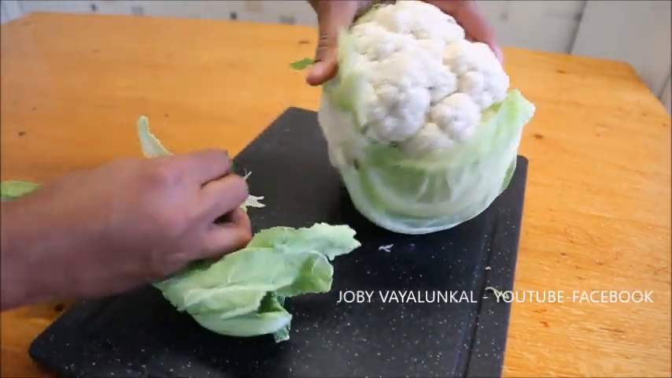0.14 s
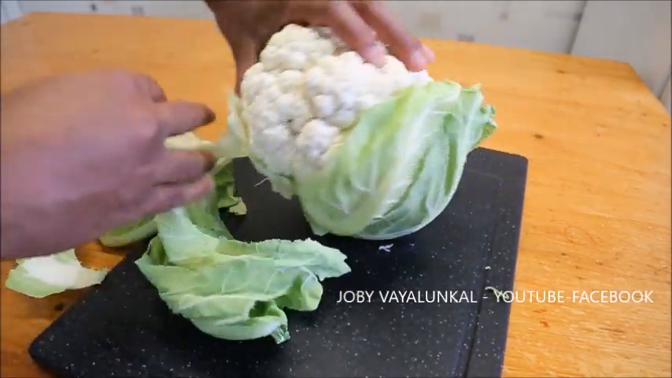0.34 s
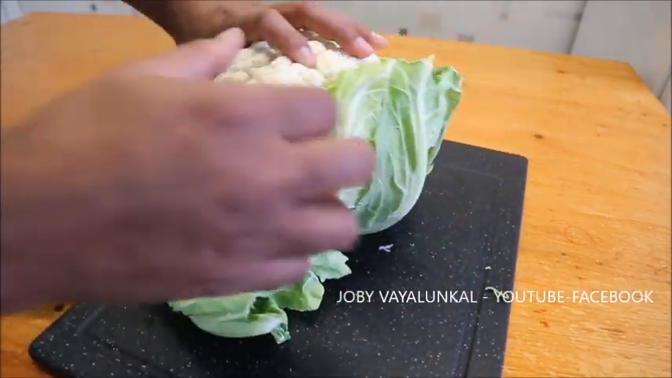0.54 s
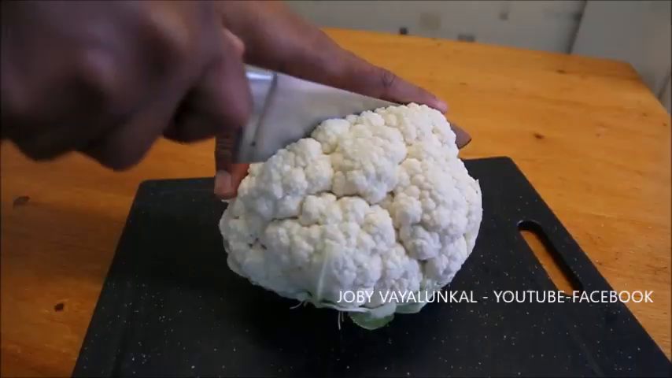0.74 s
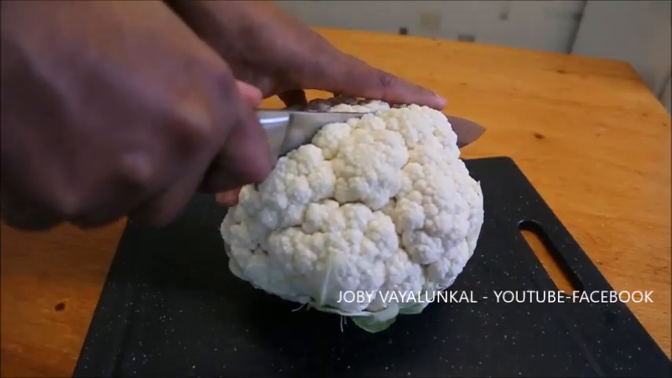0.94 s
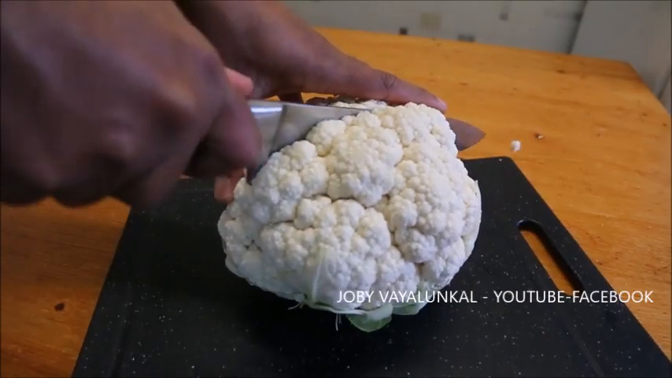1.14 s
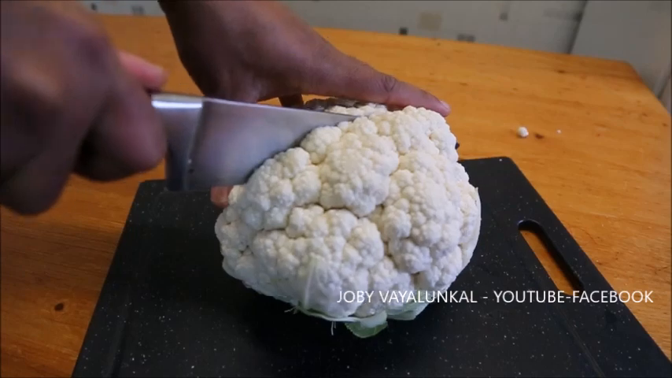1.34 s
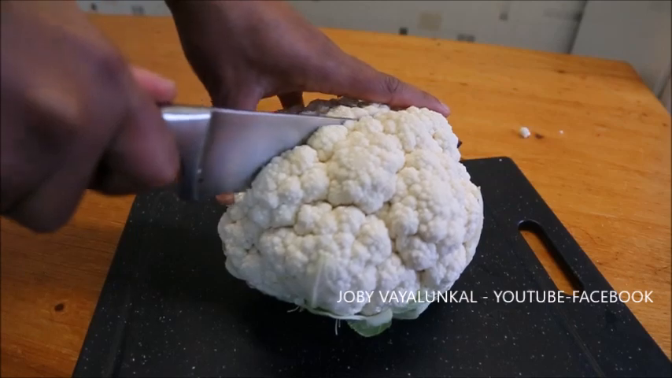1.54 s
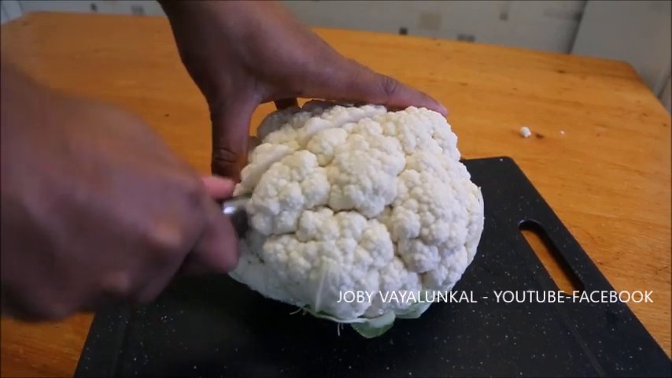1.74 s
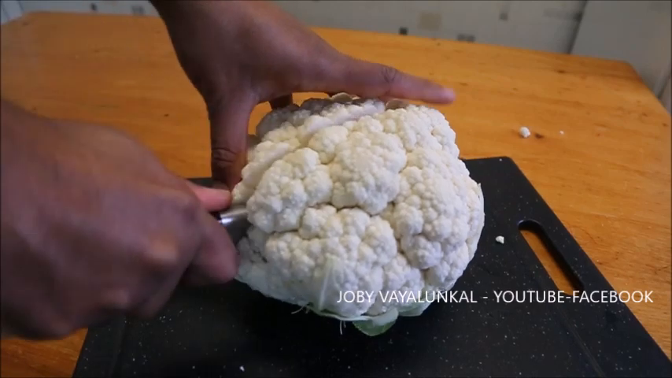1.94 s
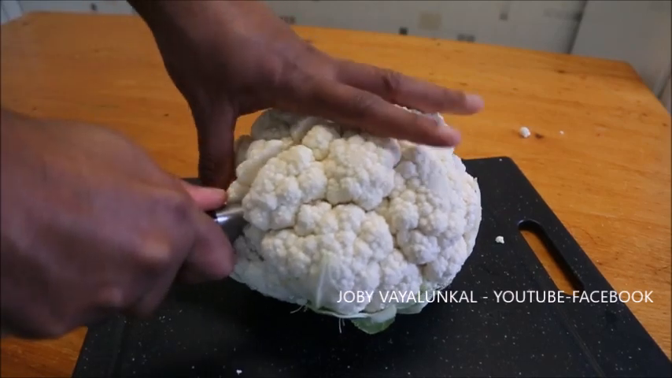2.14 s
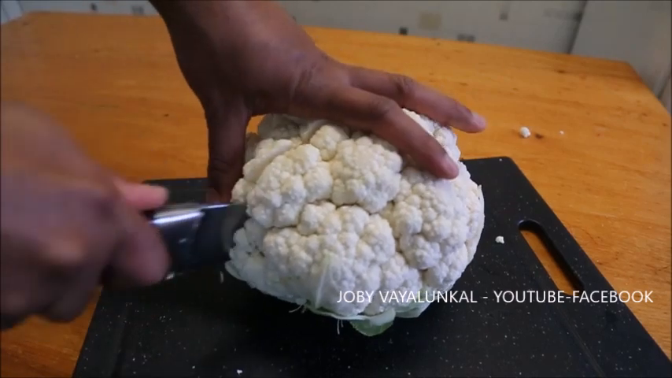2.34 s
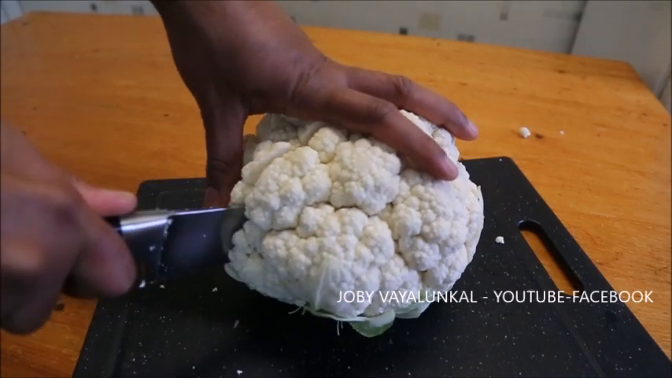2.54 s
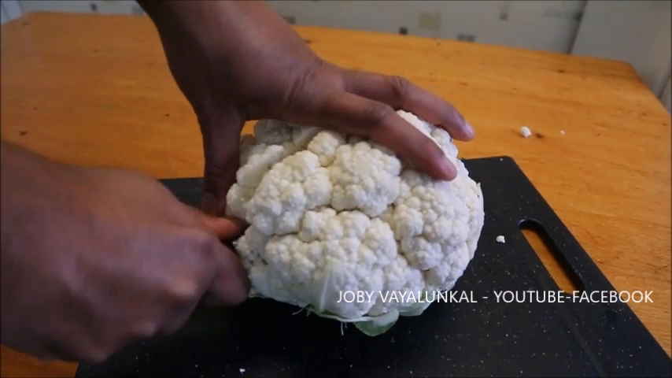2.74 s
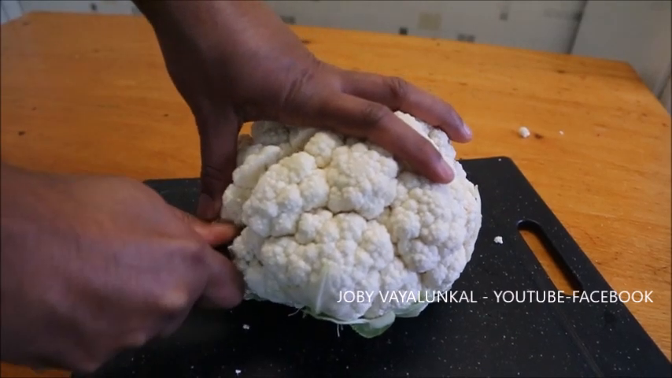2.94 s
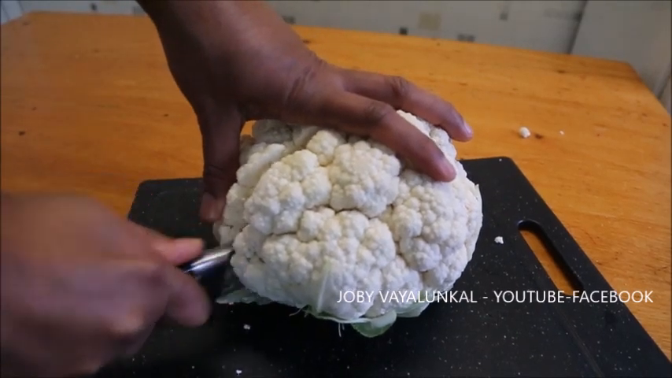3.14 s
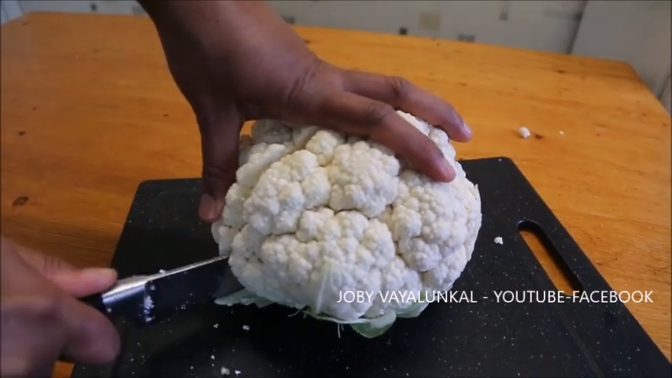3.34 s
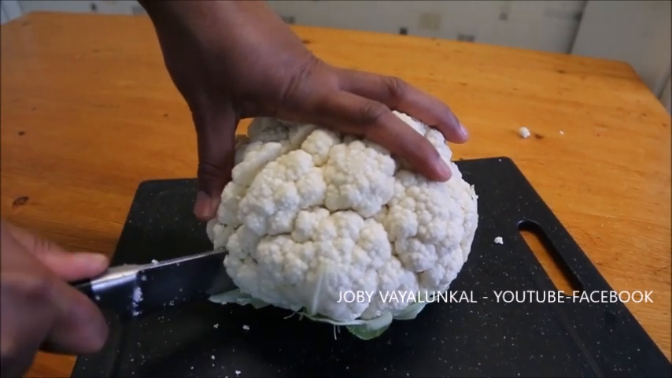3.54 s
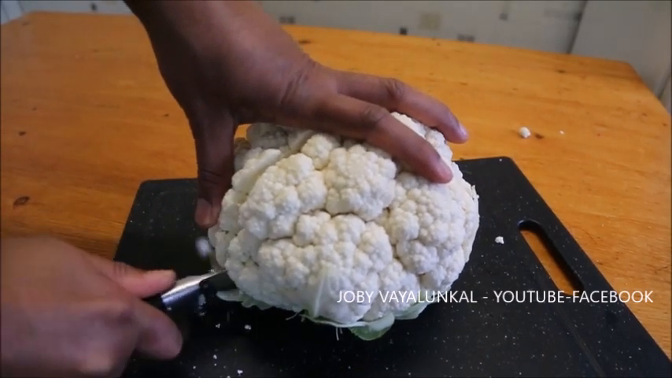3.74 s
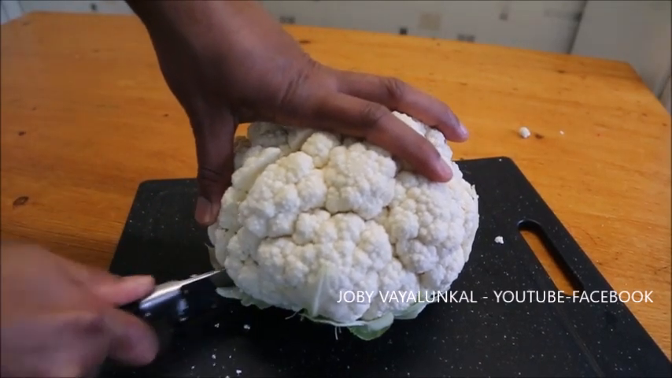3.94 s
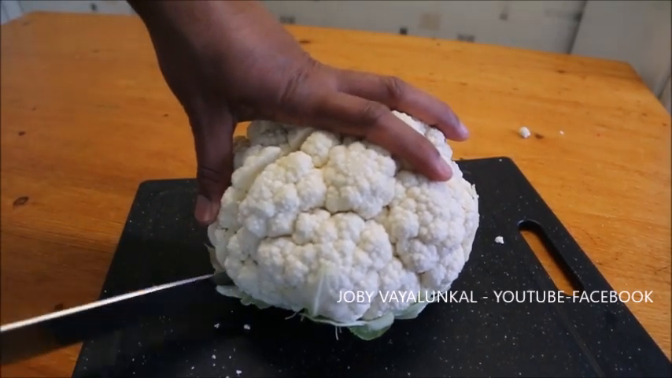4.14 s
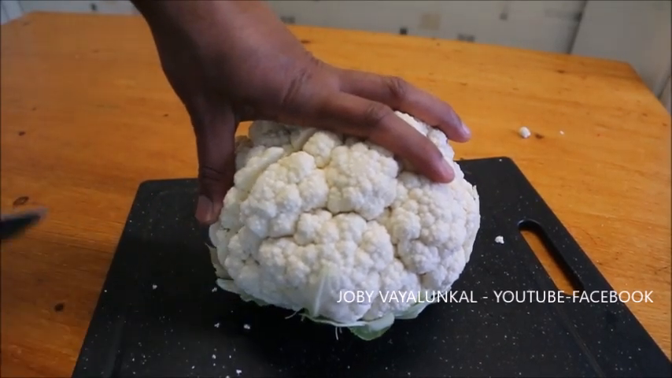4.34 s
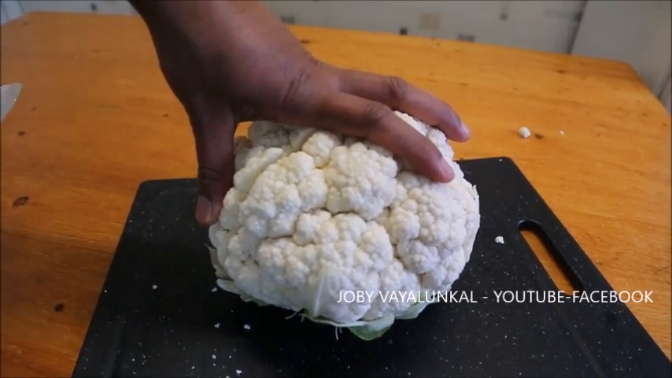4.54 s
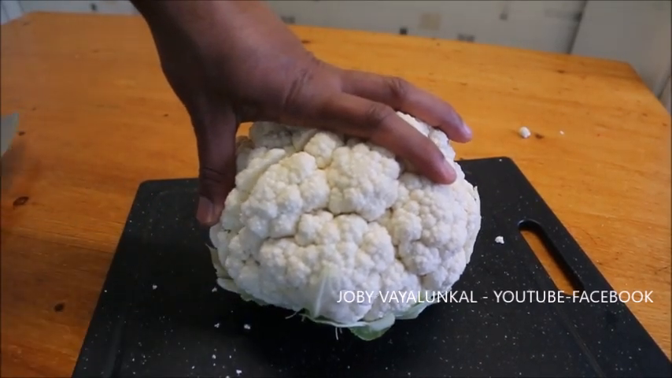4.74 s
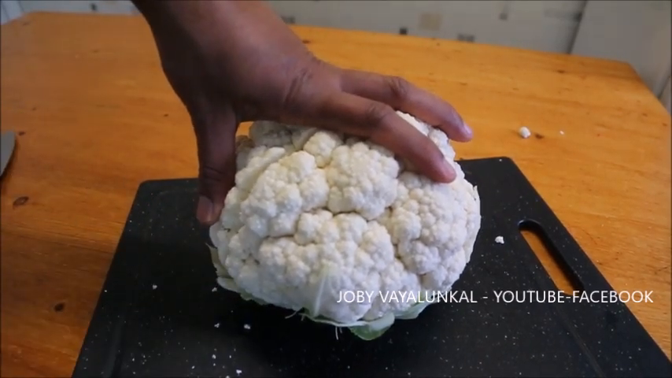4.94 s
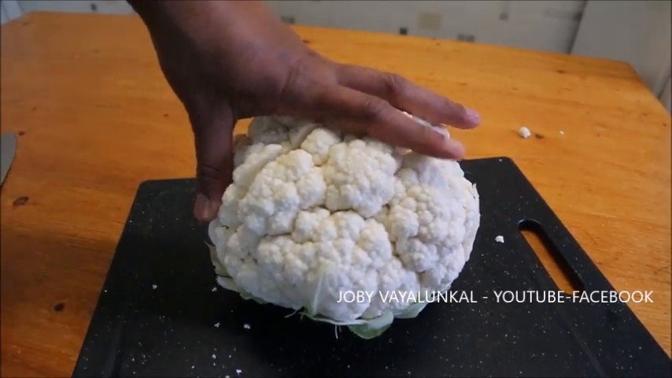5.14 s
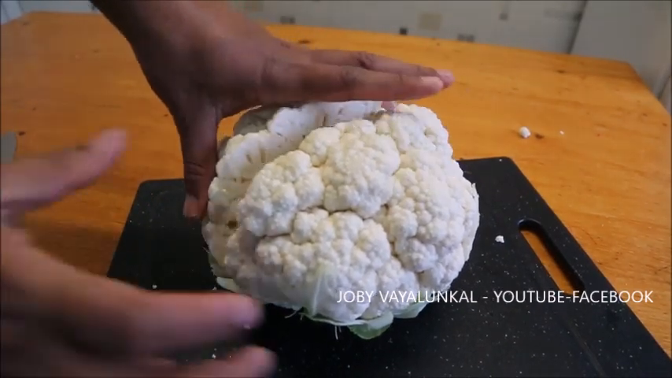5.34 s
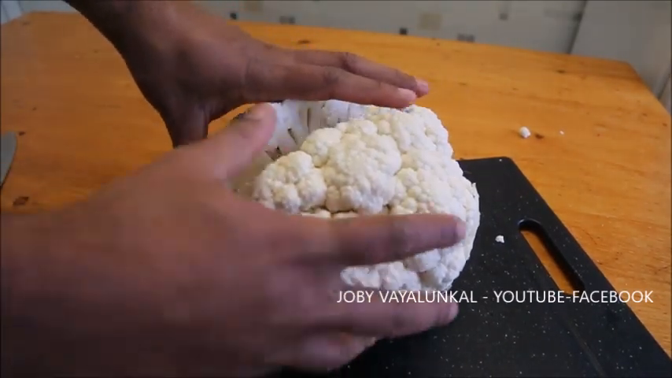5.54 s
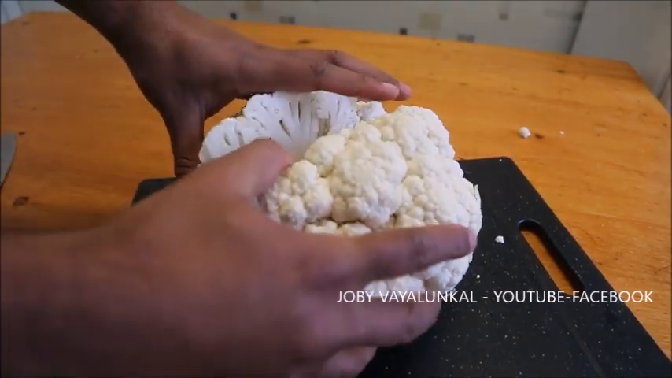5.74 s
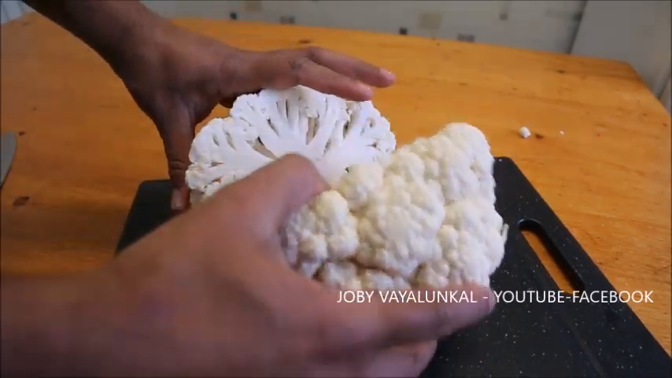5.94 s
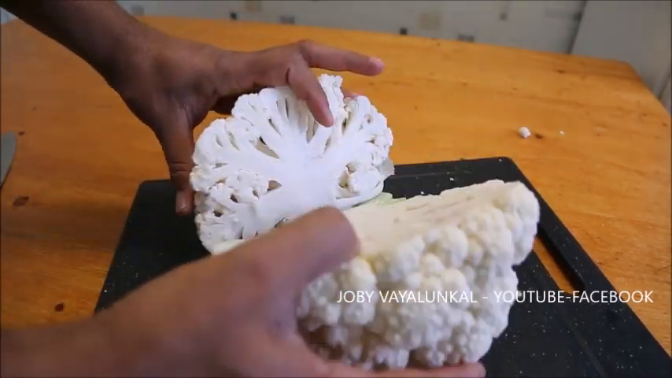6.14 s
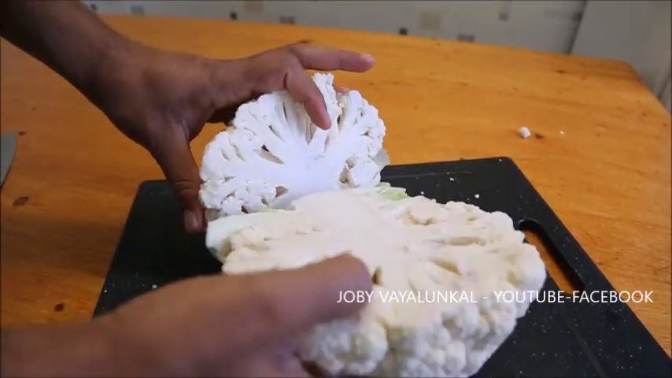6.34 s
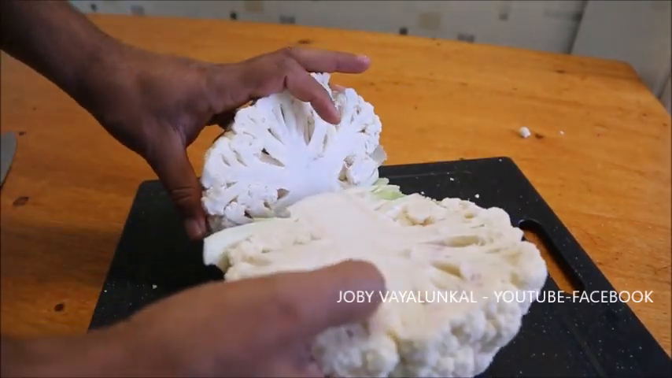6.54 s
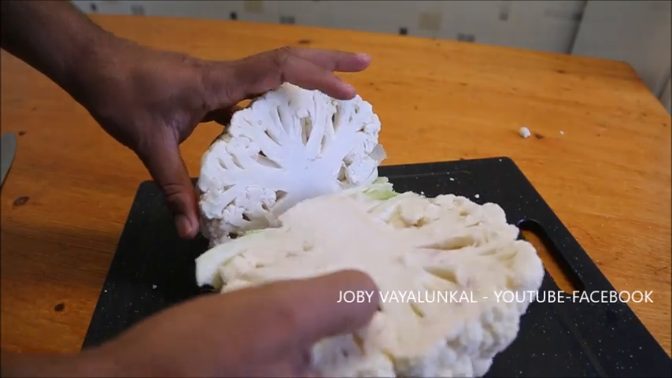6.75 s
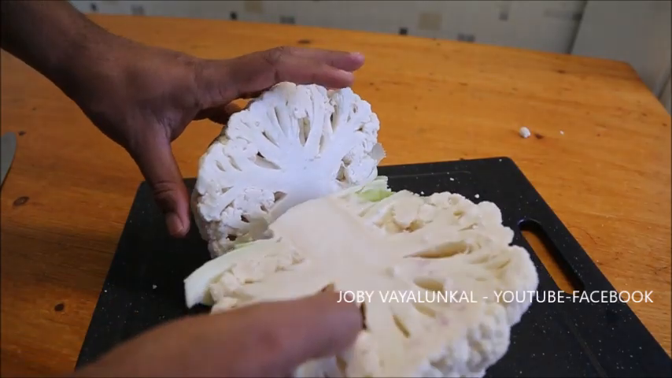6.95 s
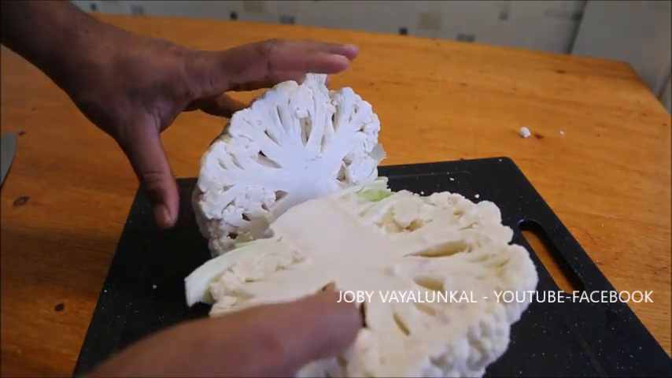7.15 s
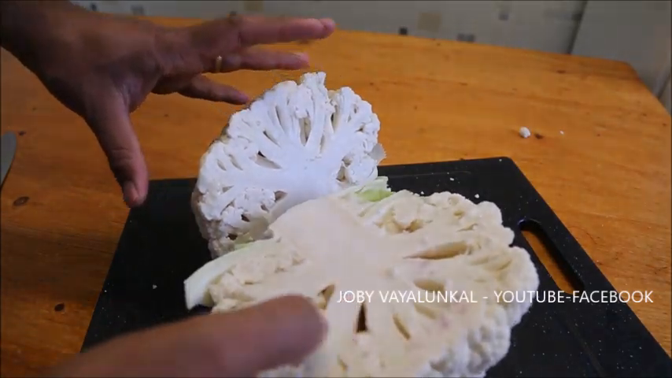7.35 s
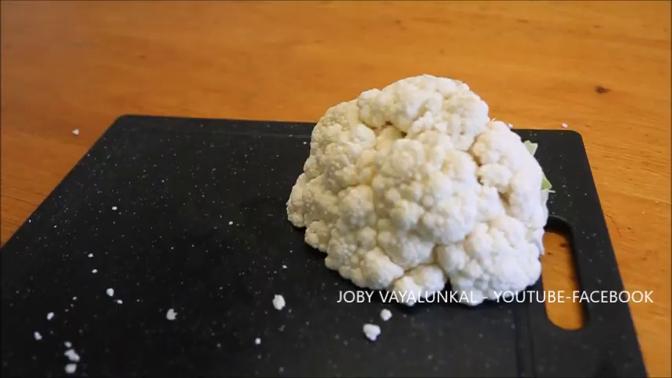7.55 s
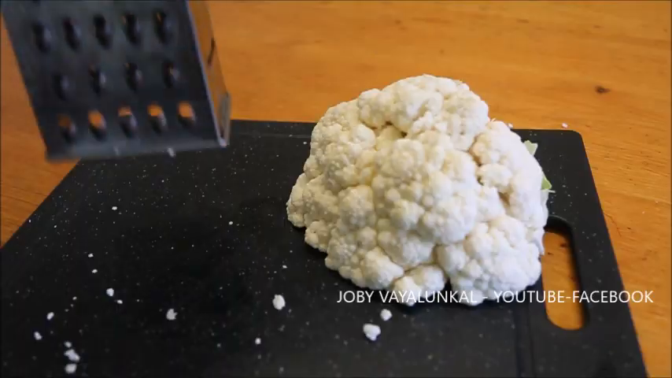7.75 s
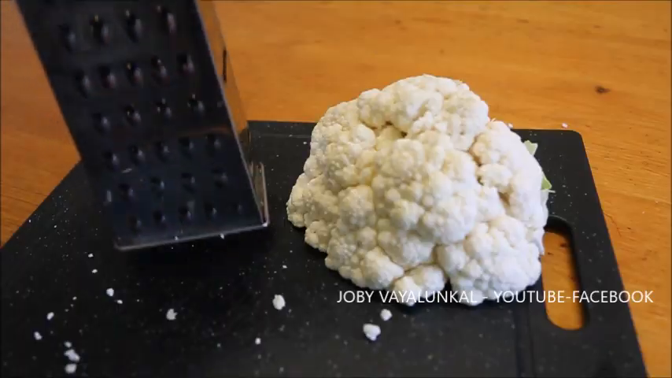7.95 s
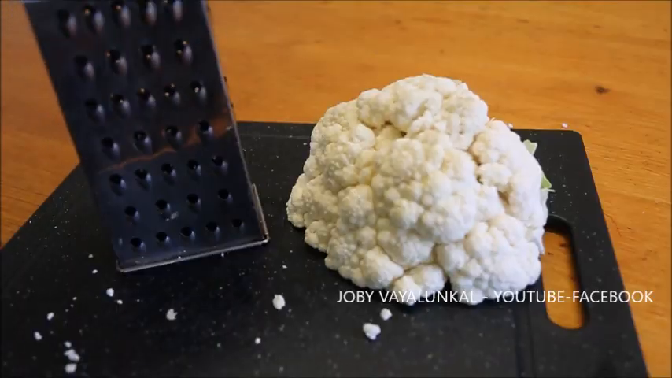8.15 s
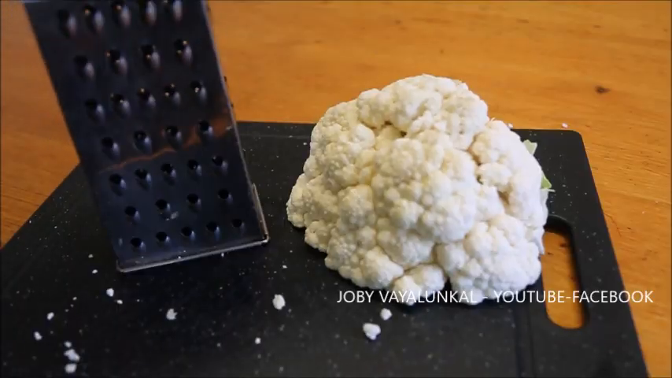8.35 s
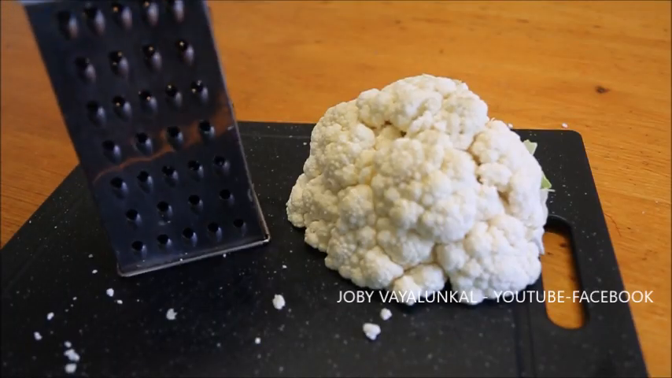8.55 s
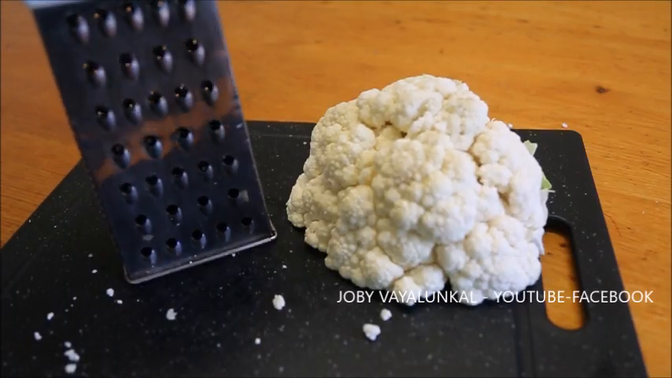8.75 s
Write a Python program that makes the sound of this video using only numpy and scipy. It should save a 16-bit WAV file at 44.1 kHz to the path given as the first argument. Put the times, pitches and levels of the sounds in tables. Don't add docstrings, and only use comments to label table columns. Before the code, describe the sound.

In a hard-walled, echoing kitchen with a steady fridge hum, leaves snap and rustle, then a knife squeaks and crunches into a cauliflower. Two hard chops crack onto a plastic board, overloading the small close microphone. The blade pulls free with a faint ring, clatters on the table, the halves thud apart, and a metal grater lands.

```python
import sys
import numpy as np
from scipy import signal
from scipy.fft import rfft, irfft, next_fast_len
from scipy.io import wavfile
from scipy.ndimage import uniform_filter1d

SR = 44100
rng = np.random.default_rng(int(sys.argv[2]) if len(sys.argv) > 2 else 0)


def volts_from_decibels(level):
    exponent = np.asarray(level, float) / 20
    return 10 ** exponent


def int16_out(signal):
    q = np.round(np.clip(np.atleast_2d(signal).T, -1, 1) * 32767)
    wavfile.write(sys.argv[1], SR, q.astype(np.int16))


N = 392478


def evened(x):
    return x / np.sqrt(np.mean(x ** 2) + 1e-20)


def peaked(x):
    return x / abs(x).max()


def read(points, hz):
    f, value = np.transpose(points)
    return np.interp(np.log(hz + 1), np.log(f + 1), value)


def along(rows):
    s, *columns = np.transpose(rows)
    t = np.arange(round(s[0] * SR), min(round(s[-1] * SR), N)) / SR
    return [np.interp(t, s, c) for c in columns]


def add(mix, s, sound):
    part = mix[round(s * SR):][:len(sound)]
    part += sound[:len(part)]


def colour(x, points):
    size = next_fast_len(len(x))
    gain = volts_from_decibels(read(points, np.fft.rfftfreq(size, 1 / SR)))
    return irfft(rfft(x, size) * gain, size)[:len(x)]


def band(x, lo_hz, hi_hz):
    sos = signal.butter(2, [lo_hz, min(hi_hz, SR / 2.2)], "band", fs=SR, output="sos")
    return evened(signal.sosfilt(sos, x))


def drift(per_s):
    knots = rng.standard_normal(1000)
    return evened(np.interp(np.arange(N) * per_s / SR, np.arange(len(knots)), knots))


def swells(rows):
    t = np.arange(0, N + 50, 50) / SR
    s, db, swell_s, fade_s = np.transpose(rows)[:, :, None]
    drop_db = 20 * np.where(t < s, (s - t) / swell_s, (t - s) / fade_s)
    return np.interp(np.arange(N) / SR, t, volts_from_decibels(db - drop_db).sum(0))


def grains(per_s, spread_db, wash):
    size = volts_from_decibels(spread_db * np.minimum(rng.exponential(1, N), 3))
    bursts = size * (rng.random(N) < per_s / SR) * rng.standard_normal(N)
    return (evened(bursts) + wash * rng.standard_normal(N)) * volts_from_decibels(3.3 * np.tanh(drift(60)))


def struck(blows, modes, damp, crack_db, crack_s, lo_hz, hi_hz, front_s=1):
    direct, sent = np.zeros(N), np.zeros(N)
    t = np.arange(0, min(.5, .06 + damp * max(m[2] for m in modes)), 1 / SR)
    click = band(1. * (t == 0), lo_hz, hi_hz)
    spreads = np.repeat([.001, .007], len(modes))
    for s, db, room_db in blows:
        shares = rng.standard_normal((2 * len(modes), 2)) * [2, 1]
        ring = np.zeros(len(t))
        for (hz, mode_db, t60_s), spread, (spot_db, detune) in zip(modes + modes, spreads, shares):
            level_db = mode_db + spot_db - 60 * t / (damp * min(t60_s, .8))
            ring += volts_from_decibels(level_db) * np.sin(2 * np.pi * hz * (1 + spread * detune) * t)
        ring *= np.minimum(t / .0005, 1)
        crack = band(rng.standard_normal(len(t)) * np.exp(-t / crack_s), lo_hz, hi_hz)
        sound = peaked(band(ring, 70, SR / 2)) + volts_from_decibels(crack_db) * peaked(crack)
        add(direct, s, volts_from_decibels(db) * sound)
        front = peaked(ring * np.exp(-t / front_s)) + volts_from_decibels(5) * peaked(click)
        add(sent, s, volts_from_decibels(db + room_db) * front)
    return np.array([direct, sent])


def radiated(blows, colour_db, dips=((1, 0), (2, 0))):
    out = np.zeros(N)
    front = colour(colour(signal.unit_impulse(1024, 128), colour_db), dips)
    for s, db, room_db in blows:
        add(out, s - 128 / SR, volts_from_decibels(db + room_db) * front / np.linalg.norm(front))
    return out


# (frequency [Hz], density [dB per Hz])
AIR = [(20, -29), (150, -12.5), (300, -11.5), (1200, -23), (2400, -31), (5200, -30), (6000, -32.5),
       (15500, -39)]
# (frequency [Hz], level [dB rms])
MOTOR = [(145.5, -57.5), (245.7, -50), (299, -53), (324, -51), (343.7, -48.5), (490, -60), (589, -61),
         (1965, -64.5), (3252, -70.5), (5357, -62)]


def hum():
    air = colour(rng.standard_normal(N), AIR)
    reference = signal.butter(4, [2000, 15000], "band", fs=SR, output="sos")
    out = air * volts_from_decibels(-50) / np.std(signal.sosfilt(reference, air))
    t = np.arange(N) / SR
    for hz, db in MOTOR:
        level = volts_from_decibels(db + 7.5 + 3.36 * np.tanh(drift(7.3)))
        wander_rad = .5 * (hz / 300) ** 0.765 * drift(9)
        out += level * np.sin(2 * np.pi * hz * t + wander_rad)
    return out


# (frequency [Hz], t60 [s])
KITCHEN_T60 = [(120, 0.36), (400, 0.76), (1000, 0.87), (2500, 0.97), (6000, 0.87), (9000, 0.61),
               (15000, 0.16)]
# (frequency [Hz], level [dB])
WALLS = [(70, 11), (200, 10), (1000, -0.5), (3500, -1.5), (5300, 6.5), (8000, -11.5), (15000, -41)]


def kitchen(x):
    taps = np.zeros(SR)
    at = np.arange(260, SR - 20, 12)
    taps[at + rng.integers(0, 12, len(at))] = rng.choice([-1., 1.], len(at))
    hz, t, z = signal.stft(taps, SR, nperseg=256)
    level_db = read(WALLS, hz)[:, None] - 60 * t / read(KITCHEN_T60, hz)[:, None]
    tail = signal.istft(z * volts_from_decibels(level_db), SR, nperseg=256)[1]
    return signal.fftconvolve(x, tail / np.linalg.norm(tail))[:N]


# (peak time [s], level [dB], swell [s], fade [s])
ROCKING = [(.1, -34, 0.12, 0.23), (.47, -44, 0.088, 0.34), (.92, -34, 0.091, 0.08), (1.32, -50, 0.33, 0.13),
           (1.76, -26.5, 0.083, 0.12), (2.22, -36, .15, 0.26), (2.72, -38, .15, 0.092),
           (3.2, -45, 0.16, 0.11), (3.72, -29, 0.056, 0.15), (5.0, -41, 0.037, .3), (5.62, -50, 0.28, 0.18),
           (5.92, -35, 0.071, 0.138), (8.055, -32, 0.024, 0.055), (8.82, -44, .15, 0.067)]


def rocking():
    return (swells(ROCKING) + volts_from_decibels(-63)) * band(rng.standard_normal(N), 37.9, 86)


# (time [s], peak [dB], room [dB])
GRATER_DOWN = [
    (8.045, 5, 8),
    (8.067, -8.5, 7),
    (8.0755, -6.5, 11.5),
]
# (frequency [Hz], level [dB], t60 [s])
GRATER_BOX = [(299, -15, 0.66), (390, -15, 0.12), (560, -14, 0.19), (735, -1, 0.093), (930, 4, 0.16),
              (1130, 3.5, 0.1), (1660, -6, 0.16), (2700, -14, 0.13)]
# (frequency [Hz], level [dB])
GRATER_ECHO = [(170, -18), (280, -8.5), (900, -7.5), (1700, -18.5), (2600, -25.5), (4000, -22.5),
               (5700, -29.5), (9000, -25.5)]
# (time [s], peak [dB], room [dB])
SHEET_DOWN = [
    (8.045, 7, -33),
    (8.067, -9, -30),
    (8.0755, -15, -30),
]
# (frequency [Hz], level [dB], t60 [s])
SHEET = [(3693, -2, .012), (4500, -2, .008), (5900, -2, .01), (7200, -8, .006)]
# (time [s], peak [dB], room [dB])
GRATER_TICK = [
    (8.838, -25.5, -0.5),
]
# (frequency [Hz], level [dB], t60 [s])
GRATER_RIM = [(930, 2, 0.06), (2100, -6, .03), (3700, -10, .06), (4330, -7, 0.08), (5066, -12, .14),
              (5630, -10, 0.07)]


def grater():
    box = struck(GRATER_DOWN, GRATER_BOX, 0.21, -2.1, 0.0048, 240, 1250)[0]
    sheet = volts_from_decibels(-7) * struck(SHEET_DOWN, SHEET, 1, 0.99, 0.005, 2200, 7000, front_s=.00065)
    rim = struck(GRATER_TICK, GRATER_RIM, 0.88, 1.3, 0.014, 800, 5800)
    return np.array([box, radiated(GRATER_DOWN, GRATER_ECHO)]) + sheet + rim


# (time [s], peak [dB], room [dB])
NUDGES = [
    (2.197, -20.5, -10.5),
    (2.212, -26, -23),
]
# (time [s], peak [dB], room [dB])
HALF_DOWN = [
    (5.8965, -0.68, -17),
]
# (frequency [Hz], level [dB], t60 [s])
HALF = [(144.5, -6, 0.52), (217, -18, 0.39), (336.7, 3, 0.19), (458, 1, 0.5), (589, -3, 0.18),
        (698, -7, 0.17), (930, -2.5, .08), (1380, -16, .1), (2470, -20, .04)]
# (time [s], peak [dB], room [dB])
SETTLING = [
    (5.7947, -26.5, -21),
    (6.2353, -12.5, -13.5),
    (6.296, -36, -24),
    (6.3341, -13, -20),
    (6.3867, -24, -24),
    (6.6134, -28, -14),
]
# (frequency [Hz], level [dB], t60 [s])
STALK = [(925, -19, .3), (960, -4, .05), (1250, -3, .022), (1500, 0, .022), (1800, -5, .016)]


def halves():
    return (struck(SETTLING, STALK, 0.72, -6.5, 0.0017, 950, 1800)
            + struck(NUDGES, HALF[:3], .5, -12, .01, 150, 450)
            + struck(HALF_DOWN, HALF, 0.58, -4.5, 0.019, 180, 610))


# (peak time [s], level [dB], swell [s], fade [s])
CRUMBS = [
    (6.28, -43, .07, 0.054),
    (6.315, -51, .04, .03),
    (6.37, -44, .05, 0.056),
]


def crumbs():
    return swells(CRUMBS) * band(band(grains(1200, 2.7, .4), 2000, 3100), 1900, 3100)


# (time [s], peak [dB], room [dB])
KNIFE_DOWN = [
    (4.975, -7.5, -4.5),
    (5.028, -6.5, -9),
    (5.081, -9.5, -8),
    (5.094, -18, -19),
    (5.113, -11.5, -9),
    (5.122, -7.5, -9),
    (5.132, -17, -15),
    (5.143, -21, -11),
]
# (frequency [Hz], level [dB], t60 [s])
BLADE_FREE = [(1061, -1, 0.6), (1513, -5, .15), (2090, 2, 0.22), (2632, -6, .25), (2945, -8, .3),
              (3375, -6, .4), (3618, 0, 0.25), (4334, -3, 0.25), (5122, -6, .4), (5490, -5, 0.25),
              (5952, 2, 0.5), (6422, -10, 0.3), (6708, 6, 0.13), (6770, -3, .35)]
# (frequency [Hz], level [dB], t60 [s])
BLADE_EDGE = [(7348, -2, .3), (7640, -1, .25), (8040, -3, .25), (8560, -6, .26), (9286, -6, .33),
              (9680, -4, .3), (10710, -2, .2), (11320, -1, .14), (11600, -5, .1), (12270, -9, .3),
              (12750, -7, .12), (13650, -9, .15), (14370, -10, .2), (14900, -9, .1)]
# (time [s], peak [dB], room [dB])
THUMPS = [
    (4.975, -13, -8.5),
    (5.029, -13.5, -3),
    (5.0652, -3, -10.5),
    (5.113, -9.5, -8.5),
]
# (frequency [Hz], level [dB], t60 [s])
TABLE = [(154, -6, 0.28), (263, 5.5, 0.22), (378, 3.5, 0.15), (455, -0.5, .4), (672, -2, 0.16),
         (767, 1, 0.35), (1100, -5.5, 0.1), (1190, -16, 0.19), (1460, 0, 0.045)]


def knife_dropped():
    edge_gain = volts_from_decibels([[-11.5], [2]])
    return (struck(KNIFE_DOWN, BLADE_FREE, 0.38, -13, 0.01, 1300, 5500)
            + edge_gain * struck(KNIFE_DOWN, BLADE_EDGE, 0.85, -7, 0.012, 7000, 14000)
            + struck(THUMPS, TABLE, 0.44, -5.5, 0.024, 300, 970))


# (time [s], peak [dB], room [dB])
BLADE_OUT = [
    (4.077, -38, -18),
    (4.136, -18.5, -8),
    (4.145, -22, -6),
    (4.296, -35, -7),
]
# (frequency [Hz], level [dB], t60 [s])
BLADE_HELD = [(4393, -12, .4), (5792, -9, .5), (5949, -13, .5), (6401, -4, 0.33), (6767, -4.5, 0.24),
              (7364, -5, .3), (8285, -14, 0.88), (9254, -9, .32), (10230, -14, 0.3), (11110, -10, 0.15),
              (12250, -14, .35), (13030, -10, 0.15), (14200, -14, 0.33)]


def blade_drawn():
    return struck(BLADE_OUT, BLADE_HELD, 1.0, 0.5, 0.022, 3900, 6800)


# (time [s], peak [dB], room [dB])
CHOPS = [
    (2.7355, 15, 6.5),
]
# (frequency [Hz], level [dB], t60 [s])
BOARD = [(335, -7, 0.25), (570, -5.5, 0.32), (1080, -7, 0.19), (1600, 5, 0.17), (1954, 5, 0.11),
         (2170, 11.5, 0.057), (3600, -5, 0.1), (4760, 4, 0.1), (5460, 1, 0.046)]
# (frequency [Hz], level [dB])
BOARD_ECHO = [(200, -22), (340, -3.5), (600, -2), (830, -6.5), (1750, 5), (2850, -7.5), (4200, -11.5),
              (5200, -15)]
# (frequency [Hz], level [dB])
BOARD_DIPS = [(2300, 0), (2850, -3), (3450, 5), (4250, -4), (5100, 2)]
# (time [s], peak [dB], room [dB])
HEEL_CHOPS = [
    (3.7192, 19, 4.75),
]
# (frequency [Hz], level [dB], t60 [s])
HEEL = [(395, -17, 0.46), (576, 0, 0.21), (1050, -10, 0.14), (1216, 0, 0.15), (1600, 7, 0.095),
        (1900, 0, .14), (2330, 0.5, 0.11), (3307, -1, 0.13), (5120, 0, 0.075), (5820, -5, .07)]
# (frequency [Hz], level [dB])
HEEL_ECHO = [(200, -25), (300, -9), (650, -4), (880, -8.5), (1200, -1.5), (2200, -4.5), (3000, -9),
             (5600, -18)]


def chops():
    middle = struck(CHOPS, BOARD, 0.088, -3, 0.0018, 550, 3300)[0]
    heel = struck(HEEL_CHOPS, HEEL, 0.081, -1.5, 0.0024, 880, 3150)[0]
    sent = radiated(CHOPS, BOARD_ECHO, BOARD_DIPS) + radiated(HEEL_CHOPS, HEEL_ECHO)
    return np.array([middle + heel, sent])


# (time [s], peak
# [dB], ring [Hz])
CRISP_SNAPS = [(0.0082, -34, 2580), (0.023, -3, 3480), (0.5904, -20, 4600), (.5906, -1.5, 9700),
               (.943, -11, 9100), (1.095, -40, 7650), (1.247, -22, 11300), (0.8685, -5.5, 4070),
               (0.8855, -5.5, 4200), (0.931, -22, 3020), (1.574, -34, 1080), (1.634, -4, 4130),
               (1.6458, -5, 4180), (1.6536, -5.5, 3770), (1.66, -6, 4200), (1.6657, 2.5, 5600),
               (1.762, -7.5, 4400), (1.797, -8, 5200), (1.819, -28, 4900), (1.826, -15, 2380),
               (1.831, -27, 5000), (1.9743, -15, 5470), (2.295, -22, 5230), (2.3301, -18.5, 4900),
               (2.6613, -9, 2020), (2.6688, -11.5, 1580), (2.6615, -7, 4860), (2.668, -5, 5000),
               (2.6845, -20, 4900), (2.6903, -1, 5700), (2.6999, -0.5, 2500), (2.7008, 0.5, 5530),
               (2.72, -16, 4300), (3.212, -3.5, 5940), (3.5261, -28, 4770), (3.6987, -5, 5170),
               (4.9752, -12, 6000), (5.0282, -7, 5970), (5.485, -8, 5450), (5.4913, -17, 5470)]
# (time [s],
# peak [dB], ring [Hz])
DULL_SNAPS = [(0.1834, -15, 3480), (0.2826, -20, 4000), (0.352, -21, 2810), (0.365, -22, 3700),
              (0.9882, -14.5, 1350), (1.001, -19.5, 1490), (1.0868, -19.5, 735), (1.159, -16, 890),
              (1.3112, -19.5, 770), (1.634, -14, 1510), (1.646, -16, 1620), (1.654, -16, 1600),
              (1.66, -15, 1600), (1.6795, -10, 1740), (1.682, -16, 3700), (1.6868, -11, 1670),
              (1.6872, -11, 3600), (1.786, -21, 4060), (1.8433, -12, 4870), (2.0678, -29, 1190),
              (2.1222, -27, 5200), (2.2464, -26, 1130), (2.495, -32, 2980), (2.566, -30.5, 1800),
              (2.6759, -16, 4800), (2.7053, -2, 2930), (3.2135, -19, 2540), (3.7127, -2, 2650),
              (3.732, -4, 1990), (5.0655, -10, 1390), (5.546, -21, 2350), (8.0757, -14, 1110)]


def snaps(rows, fizz_db, wide_share):
    out, t = np.zeros(N), np.arange(1500) / SR
    chance = rng.standard_normal((len(rows), len(t)))
    for (s, db, hz), noise in zip(rows, chance):
        burst = 0.37 * noise * np.exp(-t / (0.00071 + 4.4 / hz))
        burst[round(SR * .2 / hz)] += 2.5
        wide = band(band(burst, hz * 0.29, hz * 1.97), hz * 0.29, hz * 1.97)
        ring = peaked(band(wide, hz * 0.72, hz * 1.276)) + wide_share * peaked(wide)
        tick = band(np.roll(noise * np.exp(-t / 0.00026), round(SR * .6 / hz)), 7500, 14000)
        add(out, s, volts_from_decibels(db) * (peaked(ring) + volts_from_decibels(fizz_db) * peaked(tick)))
    return out


# (peak time [s], level [dB], swell [s], fade [s])
PUSHES = [(.8, -18.5, 0.018, 0.19), (.87, -25, 0.032, 0.057), (1.64, -23.5, 0.053, 0.11),
          (1.69, -28, 0.033, 0.18), (1.73, -15.5, 0.13, 0.14), (1.82, -28, 0.12, 0.24),
          (1.98, -39, 0.019, 0.2), (2.33, -37, 0.077, 0.25), (2.55, -38, 0.4, 0.28),
          (2.63, -29.5, 0.012, 0.056), (2.668, -17, 0.027, 0.067), (2.71, -18, 0.057, 0.1),
          (3.688, -26, 0.064, 0.079), (3.712, -11.5, 0.021, 0.036), (4.09, -22.5, 0.082, 0.065),
          (4.15, -30, 0.034, 0.08)]
# (peak time [s], level [dB], swell [s], fade [s])
BRUSHES = [(.006, -16, 0.048, 0.085), (.07, -27, 0.059, 0.27), (.24, -37.5, 0.081, 0.2),
           (.39, -39, 0.047, 0.061), (.596, -23, 0.0059, 0.014), (.64, -36, 0.093, 0.18),
           (3.2, -28, 0.16, 0.18), (3.31, -31, 0.17, 0.13), (3.53, -40, 0.052, 0.064),
           (5.5, -42.5, 0.055, 0.37), (6.29, -49, 0.33, 0.079), (6.37, -46, 0.073, 0.064),
           (6.8, -42, .06, 0.055), (7.6, -42.5, 0.17, 0.045)]
# (peak time [s], level [dB], swell [s], fade [s])
DRAGS = [(.91, -24, .02, 0.065), (1.1, -64, .03, 0.013), (1.165, -28, 0.0087, 0.17),
         (1.25, -24, 0.095, 0.044), (1.35, -23.5, 0.09, 0.1), (1.603, -13, 0.0056, 0.035),
         (4.06, -30, 0.078, 0.13), (8.61, -34.5, 0.2, 0.12), (8.7, -33.5, 0.054, 0.049),
         (8.85, -29.5, 0.14, 0.039)]
# (frequency [Hz], density [dB per Hz])
CRUNCH = [(700, -5.5), (1200, 1), (1700, 0), (2600, 0.5), (4800, -1.5), (6500, -3), (9000, -24)]


def crunch():
    body = evened(colour(grains(5000, 1.7, 1.0), CRUNCH))
    scuff = band(grains(1500, 2.6, 1.0), 345, 975)
    hiss = band(grains(5400, 1.2, 0.85), 3800, 11000)
    layers = [body, scuff, hiss]
    return (swells(PUSHES) * (volts_from_decibels([-5, -13.5, -15]) @ layers)
            + swells(BRUSHES) * (volts_from_decibels([-0.25, -11.5, -6.5]) @ layers)
            + swells(DRAGS) * (volts_from_decibels([-13.5, -6.5, -28]) @ layers))


# (middle time [s], level [dB], ring
# [Hz], length [s])
CREAKS = [(0.186, -23.5, 3390, .008), (0.367, -28, 3900, .007), (.39, -30, 2700, .012),
          (1.162, -24, 780, 0.017), (1.61, -21, 660, 0.022), (1.617, -20, 890, .014),
          (1.618, -19, 1660, 0.0089), (1.705, -17.5, 1600, .016), (1.709, -17, 2306, .014),
          (1.731, -19.5, 1900, .018), (1.732, -24, 2630, 0.0097), (3.22, -29.5, 1150, 0.025),
          (3.332, -33.5, 1132, .03), (3.677, -26, 1260, 0.016), (3.69, -28, 1900, .012),
          (3.701, -22, 1280, 0.01), (4.057, -17.5, 1734, .013), (4.059, -21, 1210, 0.014),
          (4.074, -17, 1050, 0.017), (4.075, -17, 1680, 0.01), (4.081, -22, 2700, .009),
          (4.09, -20, 1122, 0.024), (4.091, -27.5, 3700, 0.03), (4.104, -37, 450, .014),
          (4.105, -20.5, 1050, .008), (8.57, -46, 1230, .03), (8.602, -39, 930, .025),
          (8.623, -41, 940, .03), (8.64, -40, 1220, .025), (8.701, -41, 1100, .02), (8.818, -39, 930, .02)]


def creaks():
    out, rough = np.zeros(N), 0.52
    chance = rng.standard_normal((len(CREAKS), 2, 1500))
    for (s, db, hz, length_s), (wander, grit) in zip(CREAKS, chance):
        size = round(length_s * SR)
        turns = np.cumsum(hz * (1 + rough * uniform_filter1d(wander, 60)[:size])) / SR
        sound = np.sin(2 * np.pi * turns) * (1 + 4.8 * rough * uniform_filter1d(grit, 30)[:size])
        add(out, s - length_s / 2, volts_from_decibels(db) * sound * np.sqrt(np.hanning(size)))
    return out


# (time [s], slip rate [Hz])
SQUEAKS = [
    [(.779, 543), (.806, 619), (.812, 736), (.828, 847), (.84, 870), (.851, 787), (.856, 593)],
    [(.856, 573), (.875, 560), (.88, 872), (.9, 877)],
    [(1.2005, 532), (1.208, 550), (1.216, 769), (1.224, 857), (1.231, 1030)],
    [(1.334, 891), (1.343, 737), (1.357, 527)],
]
# (first level [dB], last level [dB], first roughness [ratio], last roughness [ratio],
# brightness [dB per overtone])
GRIP = [(-18.5, -15, .02, 0.045, 1.7), (-18.5, -19, 0.34, 0.21, 2.5), (-16.5, -20, 0.06, 0.27, -0.3),
        (-24, -23.5, 0.1, 0.28, 2)]
# (frequency [Hz], level [dB])
FLESH = [(300, -11), (600, 17.5), (1100, 12), (1700, 14.5), (2600, 6.5), (4000, -9), (8000, -31),
         (15000, -28)]
# (time [s], pitch [Hz], level [dB])
WHISTLE = [(.66, 11050, -66), (.72, 11550, -49), (.765, 10900, -62)]


def squeaks():
    out = np.zeros(N)
    for rows, (first_db, last_db, first_rough, last_rough, bright_db) in zip(SQUEAKS, GRIP):
        hz, = along(rows)
        size = len(hz)
        db = np.linspace(first_db, last_db, size)
        rough = np.linspace(first_rough, last_rough, size)
        jitter = (0.08 + rough) * uniform_filter1d(rng.standard_normal(size), 40)
        turns = np.cumsum(hz * (1 + jitter)) / SR
        slips = sum(volts_from_decibels(bright_db * k) * np.sin(2 * np.pi * k * turns + 0.91 * k * k)
                    for k in range(1, 12))
        drive = evened(slips) + (0.088 + rough) * rng.standard_normal(size)
        sound = evened(colour(drive, FLESH)) * signal.windows.tukey(size, .12)
        add(out, rows[0][0], volts_from_decibels(db) * sound)
    hz, db = along(WHISTLE)
    add(out, WHISTLE[0][0], volts_from_decibels(db) * np.sin(2 * np.pi * np.cumsum(hz) / SR))
    return out


def scene():
    direct, sent = grater() + halves() + knife_dropped() + blade_drawn() + chops()
    cutting = crunch() + squeaks() + creaks() + crumbs()
    snapping = (snaps(CRISP_SNAPS, fizz_db=-7.5, wide_share=1.4)
                + snaps(DULL_SNAPS, fizz_db=-36, wide_share=0.72))
    echo = kitchen(sent + volts_from_decibels(-17.5) * cutting + volts_from_decibels(-11.5) * snapping)
    return (direct + cutting + snapping + echo + rocking() + hum())[None]


# (time
# [s], # depth [dB], hold [s])
DUCKS = [
    (-.1, -9.5, 0.13),
    (2.732, -5, 0.5),
    (3.714, -9, 0.068),
    (5.064, -1.5, 0.45),
    (5.895, -1, 0.15),
    (8.051, -2, 0.29),
]


def ducking():
    fall_s, recover_s = 0.027, 0.29
    t, gain_db = np.arange(N) / SR, np.zeros(N)
    for s, db, hold_s in DUCKS:
        gain_db += np.interp(t - s, np.cumsum([0, fall_s, hold_s, recover_s]), [0, db, db, 0])
    return volts_from_decibels(gain_db)


def top_cut(x):
    return signal.sosfilt(signal.butter(12, 15650, fs=SR, output="sos"), x)


def record(dry):
    mix = np.clip(ducking() * dry, -.99, .99)
    return top_cut(mix)


dry = scene()
out = record(dry)
int16_out(out)
```